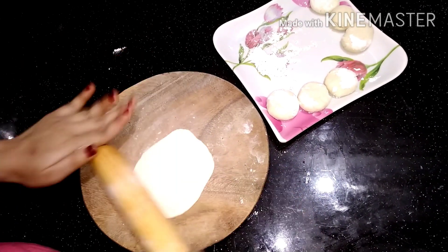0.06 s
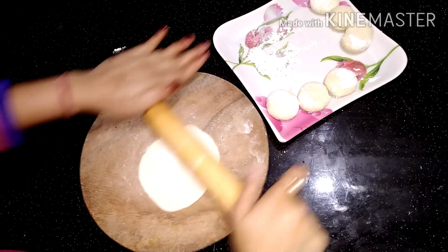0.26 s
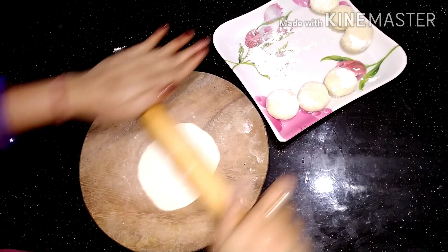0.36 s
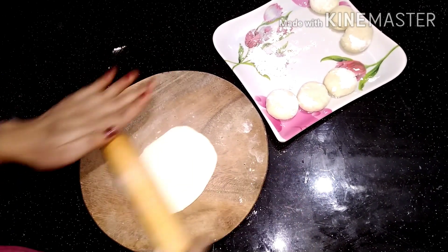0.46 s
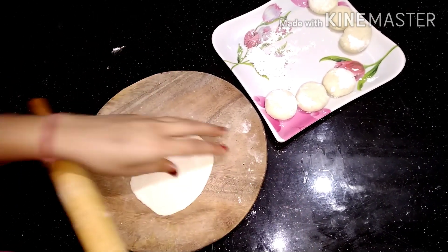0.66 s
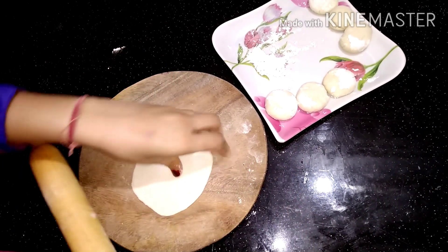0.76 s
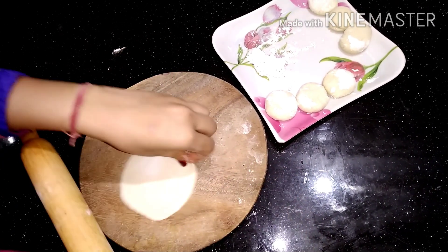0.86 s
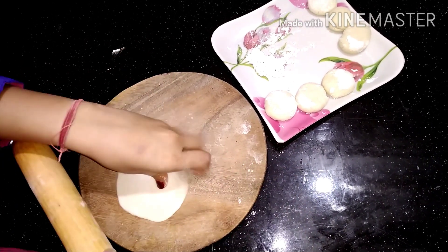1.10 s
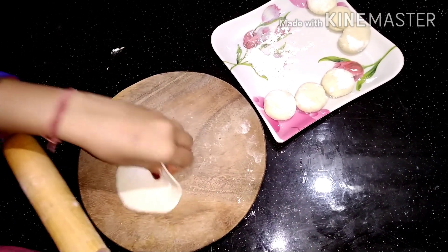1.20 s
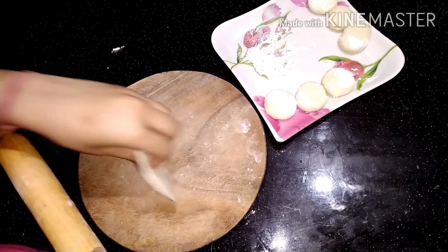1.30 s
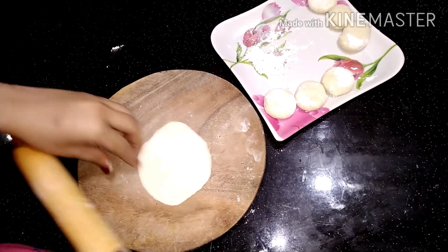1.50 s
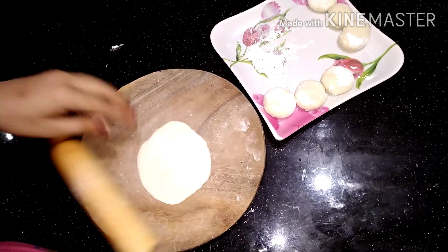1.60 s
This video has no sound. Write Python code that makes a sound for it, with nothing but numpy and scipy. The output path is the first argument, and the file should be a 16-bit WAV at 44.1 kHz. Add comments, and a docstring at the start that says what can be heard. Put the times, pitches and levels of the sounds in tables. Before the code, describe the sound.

A wooden rolling pin knocks and thuds on a board and stone counter, then dough slaps down

```python
"""Rolling out dough

A wooden rolling pin flattens dough on a round board, which rocks and thuds on the stone counter.
The pin is put down beside it, knocks and chatters to rest; the dough is turned and slapped back.
Blows ring decaying modes with a noisy crack, the chatter is random ticks, the slap is bursts and pops.
An airy, grainy hiss swells and sinks over rumble and steady room hiss; a small, hard kitchen answers."""
import sys
import numpy as np
from scipy import signal
from scipy.fft import rfft, irfft
from scipy.io import wavfile

SR = 44100
rng = np.random.default_rng(int(sys.argv[2]) if len(sys.argv) > 2 else 0)


def wrap_up_sound(samples):
    """Save the sound to the file named by the first command line argument, as 16-bit audio."""
    columns = np.atleast_2d(samples).T
    # keep every value between -1 and 1, then stretch to whole-number steps
    tamed = np.clip(columns, -1, 1)
    steps = np.round(tamed * 32767).astype(np.int16)
    wavfile.write(sys.argv[1], SR, steps)


N = 72765
TIME = np.arange(N) / SR  # s
FREQS = np.maximum(np.arange(N + 1) * SR / (2 * N), 1)  # Hz, bins of a noise twice the scene's length

# The board rocks on the counter. Each row: start in seconds, level in dB, contact brightness in Hz.
BOARD_KNOCKS = [(0.2068, 0, 960), (0.252, -21, 890), (0.365, -34.5, 1540)]
# Modes of the board. Each row: pitch in Hz, gain in dB, time to fall 60 dB in seconds.
BOARD_MODES = [(141.4, -37, 0.46), (207.6, -35.5, 0.33), (270.4, -44.5, 0.44), (278, -14.5, 0.02),
               (329, -39, 0.29), (349, -49, 0.31), (538, -28.5, 0.18), (530, -10.5, 0.029), (583, -30, 0.1),
               (614, -34, 0.12)]
# Resonances of its crack. Each row: centre in Hz, width in Hz, gain in dB.
BOARD_CRACK = [(1315, 205, 7.5), (2800, 180, 7), (3400, 470, 5), (4250, 370, 4.5), (11400, 2900, -12)]
BOARD_TOP_HZ = 587  # low-pass corner of the board's body


def board():
    """The board tips, thuds on the counter and settles back; only the first blow cracks."""
    body = knock(BOARD_KNOCKS, BOARD_MODES, BOARD_TOP_HZ)
    return body + crack(BOARD_KNOCKS[:1], -34.5, BOARD_CRACK)


# The pin runs off the dough. Each row: start in seconds, level in dB, contact brightness in Hz.
TAPS = [(0.0608, -9, 1930), (0.4858, -3, 920), (0.4968, 2.5, 2100)]
# Modes of pin and board pressed together. Each row: pitch in Hz, gain in dB, 60 dB decay in seconds.
TAP_MODES = [(324, -46, 0.12), (401, -42.5, 0.12), (463, -37, 0.026), (620, -51.5, 0.1), (836, -58, 0.12),
             (1316, -36.5, 0.023), (1746, -51, 0.08)]


def taps():
    """The pin taps the board at the ends of its strokes and rings both together."""
    return knock(TAPS, TAP_MODES, top_hz=2500)


# The pin meets the counter. Each row: start in seconds, level in dB, contact brightness in Hz.
PIN_KNOCKS = [(0.7629, -14, 2610), (0.8060, -9.5, 1010), (1.0238, 0, 1520), (1.070, -28, 2600)]
# Modes of the pin lying on the counter. Each row: pitch in Hz, gain in dB, 60 dB decay in seconds.
PIN_MODES = [(334.8, -36, 0.063), (403, -45.5, 0.17), (514.8, -33, 0.19), (558.6, -18.5, 0.033),
             (564, -39.5, 0.18), (660, -37, 0.11), (1216, -36, 0.44), (1320, -25.5, 0.36),
             (1372, -49, 0.24), (1296, -16.5, 0.046)]
# Resonances of its crack. Each row: centre in Hz, width in Hz, gain in dB.
PIN_CRACK = [(1300, 270, 10), (2200, 220, 10.5), (3100, 320, 6.5), (4470, 1500, -4.5), (11000, 6800, -13.5)]


def pin():
    """The pin knocks on the counter; every blow rings its wood and cracks."""
    return knock(PIN_KNOCKS, PIN_MODES, top_hz=785) + crack(PIN_KNOCKS, -37, PIN_CRACK)


# The pin rolls a little. Each row: centre in seconds, half length in seconds, level in dB.
CHATTERS = [(0.800, 0.0041, -35.5), (0.849, 0.011, -39.5), (1.073, 0.0065, -33.5), (1.11, 0.029, -46),
            (1.175, 0.011, -46.5)]
# Resonances of the chatter. Each row: centre in Hz, width in Hz, gain in dB.
CHATTER_BANDS = [(585, 170, 2.5), (1248, 36, 3.5), (1390, 131, 3), (1440, 250, -20), (2190, 130, -7.5),
                 (3090, 300, 2.5), (4600, 1500, -12)]


def chatter(ticks_per_s=2000):
    """The pin rolls over the gritty counter with runs of tiny contacts at random instants."""
    ticks = (rng.random(N) < ticks_per_s / SR) * rng.standard_normal(N)
    return resonate(ticks / ticks.std() * swells(CHATTERS), CHATTER_BANDS)


# The dough lands in patches. Each row: start in seconds, air level in dB, air decay to 1/e in seconds,
# pop pitch in Hz, pop gain in dB, pop 60 dB decay in seconds.
SLAPS = [(1.5255, -31.5, 0.0052, 2370, -40, .01), (1.531, -27.5, 0.0039, 4150, -28.5, 0.0079),
         (1.535, -25.5, 0.0024, 2500, -22.5, 0.017), (1.5524, -30.5, 0.0038, 1350, -35, 0.04)]
# Resonances of the squeezed air. Each row: centre in Hz, width in Hz, gain in dB.
SLAP_BANDS = [(328, 65, 4.5), (620, 130, 1.5), (1316, 37, 9.5), (1700, 320, -3.5), (2650, 740, 1.5),
              (3880, 1180, -3.5), (12300, 2200, -21)]
# The dough's full weight pats the board. Each row: start in seconds, level in dB, brightness in Hz.
PATS = [(1.5345, -26, 2520), (1.551, -28.5, 4000)]


def dough():
    """Each patch that lands squeezes out air with a wet crack and a short pop; the board answers dully."""
    puffs = sum(from_db(db) * burst(s, decay) for s, db, decay, *_ in SLAPS)
    air = puffs * rng.standard_normal(N)
    pops = sum(ring(signal.unit_impulse(N, int(s * SR)), [pop]) for s, _, _, *pop in SLAPS)
    answer = knock(PATS, BOARD_MODES, BOARD_TOP_HZ)
    return resonate(air, SLAP_BANDS) + pops + answer


# Modes of the counter. Each row: pitch in Hz, gain in dB, 60 dB decay in seconds.
BOOM_MODES = [(60.6, -46, 0.79), (80, -21, 0.099), (89.3, -32, 1.45), (114.7, -34.5, 1.05)]


def boom(build_s=0.013):
    """The board's thud sets the whole counter humming, with a gradual onset."""
    s, _, hz = BOARD_KNOCKS[0]
    build = 1 - np.exp(-((TIME - s) / build_s) ** 2)
    return ring(contact(s, hz), BOOM_MODES) * build


# Swells of the airy hiss. Each row: centre in seconds, half length in seconds, level in dB.
HISS_SWELLS = [(.08, 0.12, -55.5), (.265, 0.09, -64), (.43, 0.035, -60), (.555, 0.13, -57),
               (.81, 0.074, -55.5), (.89, 0.051, -67), (1.15, 0.051, -61), (1.265, .055, -57),
               (1.63, 0.044, -64)]
# Colour of the airy hiss. Each row: frequency in Hz, relative level in dB.
AIRY_SPECTRUM = [(500, 19), (1200, 0), (2400, 6), (4000, 6), (5200, 2.5), (6500, 1.5), (7800, -35),
                 (9000, 1.5), (11000, 6.5), (13000, 7), (15500, 2)]


def airy_hiss(grain_db=2.0, grain_s=0.0018):
    """Airy hiss swells and sinks; quick random changes of level give it a fine grain."""
    grain = np.interp(TIME / grain_s, np.arange(N), rng.standard_normal(N))
    return from_db(grain_db * grain) * swells(HISS_SWELLS) * noise(AIRY_SPECTRUM)


# Rolling and handling. Each row: time in seconds, level in dB.
RUMBLE = [(0, -47), (.14, -52.5), (.19, -52.5), (.33, -53), (.48, -48.5), (.62, -50.5), (.74, -58.5),
          (.87, -48.5), (.97, -65.5), (1.12, -52), (1.32, -60), (1.48, -74), (1.58, -55), (1.65, -57.5)]
# Colour of the rumble. Each row: frequency in Hz, relative level in dB.
RUMBLE_SPECTRUM = [(25, -24), (50, -11.5), (75, -5), (95, -4.5), (125, -2.5), (170, -23.5), (350, -22.5),
                   (600, -44), (1000, -34.5), (3000, -42.5)]


def rumble():
    """Rolling and handling shake out low noise that swells and sinks."""
    return level(RUMBLE) * noise(RUMBLE_SPECTRUM)


# Colour of the room hiss. Each row: frequency in Hz, relative level in dB per Hz.
FLOOR_SPECTRUM = [(30, -19), (100, 11), (300, 3.5), (600, 2), (1000, -10.5), (2000, -5.5), (2700, -7),
                  (3150, 6), (3800, -13), (5100, -1), (7500, -18), (11000, -11.5), (15500, -15)]


def room_hiss(floor_db=-60):
    """The room hisses steadily as coloured noise."""
    return from_db(floor_db) * noise(FLOOR_SPECTRUM)


# Early echoes from counter and walls. Each row: delay in seconds, left gain, right gain.
ECHOES = [(.0037, 0.091, -0.052), (0.0119, 0.37, -0.23), (0.0173, .2, -.05)]
# Colour of the reverberation. Each row: frequency in Hz, level in dB.
ROOM_COLOUR = [(60, -30), (200, -5), (560, -1.5), (850, -6.5), (1300, 0.5), (3000, -8), (7000, -3),
               (15000, 1.5)]
# Decay of the reverberation. Each row: frequency in Hz, time to fall 60 dB in seconds.
ROOM_T60 = [(100, 0.7), (500, 0.37), (1400, 0.34), (4000, 0.24), (12000, 0.4)]
LEFT_LAG_S, TAIL_BUILD_S = 0.0001, 0.0051
SHADOW_HZ, SHADOW_DB = 840, -12  # the left side hears less direct treble


def kitchen(x, left_db, wet_db):
    """Direct sound, later and duller on the left, a few early echoes and a tail dying by octave."""
    bass = signal.lfilter(*signal.butter(1, SHADOW_HZ, fs=SR), x)
    shadowed = bass + from_db(SHADOW_DB) * (x - bass)
    direct = np.array([from_db(left_db) * delayed(shadowed, LEFT_LAG_S), x])
    early = sum(delayed(x, s) * np.array([[left], [right]]) for s, left, right in ECHOES)

    coloured = noise_spectrum() * from_db(at_hz(ROOM_COLOUR, FREQS))
    build = 1 - np.exp(-(TIME / TAIL_BUILD_S) ** 2)
    tail = 0
    for hz in 62.5 * 2 ** np.arange(9):
        band = np.clip(1 - np.abs(np.log2(FREQS / hz)), 0, 1)  # overlapping triangles, an octave apart
        fade = np.exp(-np.log(1000) * TIME / at_hz(ROOM_T60, hz)) * build
        tail = tail + irfft(coloured * band)[:, :N] * fade / np.linalg.norm(fade)
    wet = signal.fftconvolve(tail, x[None], axes=1)[:, :N]
    return direct + early + from_db(wet_db) * wet


def knock(rows, modes, top_hz):
    """Blows ring a wooden body, heard without its top."""
    force = sum(from_db(db) * contact(s, hz) for s, db, hz in rows)
    return muffled(ring(force, modes), top_hz)


def crack(rows, level_db, bands, decay_s=0.0034):
    """Grit is crushed at the instant of each blow: resonant noise, its level set against the knock."""
    bursts = sum(from_db(db + level_db) * burst(s, decay_s) for s, db, _ in rows)
    return resonate(bursts * rng.standard_normal(N), bands)


def contact(s, hz):
    """A force pulse of unit area; softer contacts last longer."""
    age = np.maximum(TIME - s, 0) * 2 * np.pi * hz
    pulse = age * np.exp(-np.minimum(age, 60))
    return pulse / (pulse.sum() + 1e-12)


def ring(force, modes):
    """A force sets every mode ringing; the slow part of the push does not radiate."""
    out = 0
    for hz, db, t60 in modes:
        r = np.exp(-np.log(1000) / (t60 * SR))
        w = 2 * np.pi * hz / SR
        poles = [1, -2 * r * np.cos(w), r * r]
        out = out + from_db(db) * signal.lfilter([.5, 0, -.5], poles, force + 1e-18)
    return out


def resonate(x, bands):
    """Broad resonances side by side, in alternating polarity."""
    out = 0
    for k, (hz, width_hz, db) in enumerate(bands):
        r = np.exp(-np.pi * width_hz / SR)
        poles = [1, -2 * r * np.cos(2 * np.pi * hz / SR), r * r]
        band = signal.lfilter([1 - r * r, 0, r * r - 1], poles, x + 1e-18)
        out = out + (-1) ** k * from_db(db) * band
    return out


def muffled(x, hz):
    """Take away the top with a low-pass."""
    return signal.sosfilt(signal.butter(4, hz, fs=SR, output="sos"), x)


def burst(s, decay):
    """A sudden start that dies away exponentially."""
    return (TIME > s) * np.exp(-np.abs(TIME - s) / decay)


def swells(rows):
    """Bell-shaped rises and falls of level."""
    return sum(from_db(db) * np.exp(-((TIME - s) / half) ** 2) for s, half, db in rows)


def level(rows):
    """A dB curve as gain over time."""
    return from_db(np.interp(TIME, *np.transpose(rows)))


def delayed(x, s):
    """The same sound a little later."""
    return np.interp(TIME - s, TIME, x, left=0)


# Likeness of the two sides. Each row: frequency in Hz, correlation from 0 to 1.
LIKENESS = [(100, .985), (250, .85), (500, .1), (1000, 0), (2000, 0), (12000, 0)]


def noise_spectrum():
    """White stereo noise in the frequency domain, alike on both sides in the bass."""
    alike = np.clip(at_hz(LIKENESS, FREQS), -1, 1)
    mid, side = rfft(rng.standard_normal((2, 2 * N)))
    return (np.sqrt(1 + alike) * mid + np.sqrt(1 - alike) * side * [[1], [-1]]) / np.sqrt(2)


def noise(spectrum):
    """Coloured stereo noise, rms 1."""
    x = irfft(noise_spectrum() * from_db(at_hz(spectrum, FREQS)))[:, :N]
    return x / x.std()


def at_hz(points, hz):
    """Read a table on a log-frequency axis."""
    f, v = np.transpose(points)
    return np.interp(np.log(hz), np.log(f), v)


def from_db(db):
    """Decibels to gain."""
    return 10 ** (np.asarray(db) / 20)


def scene():
    """Blows in the kitchen and the counter's boom, over airy hiss, rumble and room hiss."""
    wood = kitchen(board() + taps(), left_db=0.5, wet_db=-3.5)
    wood = wood + kitchen(pin(), left_db=-1.5, wet_db=-2)
    wood = wood + kitchen(chatter(), left_db=2, wet_db=-2)
    slap = kitchen(dough(), left_db=0, wet_db=-0.5)
    return wood + slap + boom() + airy_hiss() + rumble() + room_hiss()


def record(dry, bass_cut_hz=50, top_cut_hz=15600):
    """The microphone loses the deep bass; the top is cut steeply."""
    x = signal.sosfilt(signal.butter(3, bass_cut_hz, "high", fs=SR, output="sos"), dry)
    return signal.sosfilt(signal.ellip(12, .1, 80, top_cut_hz, fs=SR, output="sos"), x)


dry = scene()
out = record(dry)
wrap_up_sound(out)
```